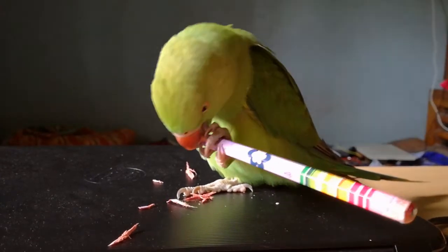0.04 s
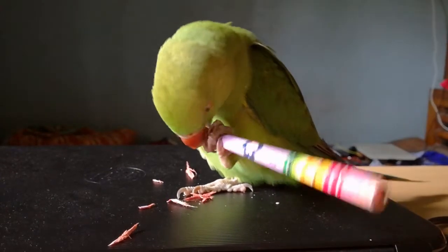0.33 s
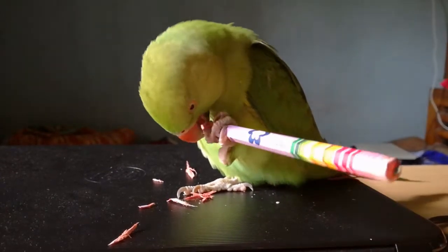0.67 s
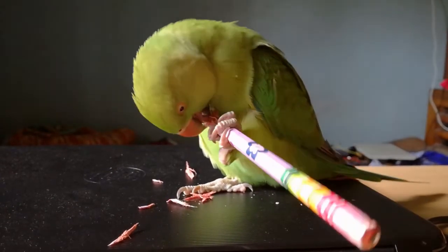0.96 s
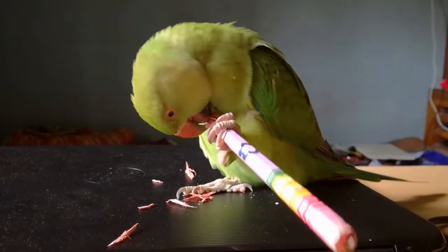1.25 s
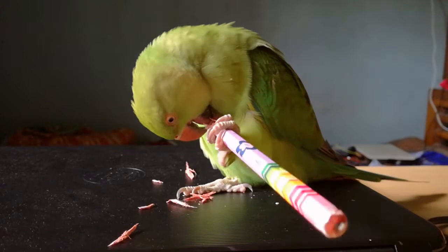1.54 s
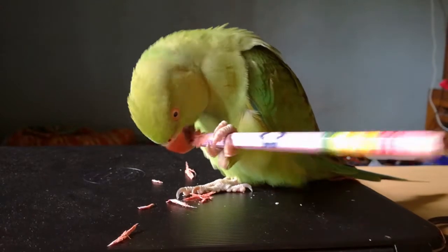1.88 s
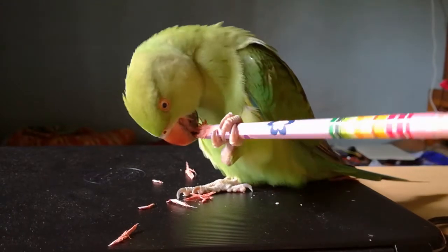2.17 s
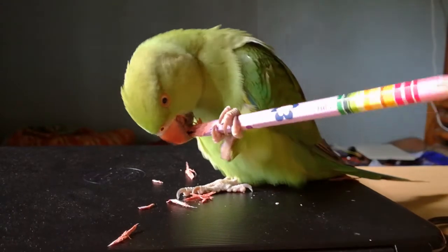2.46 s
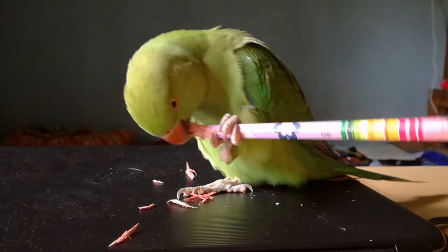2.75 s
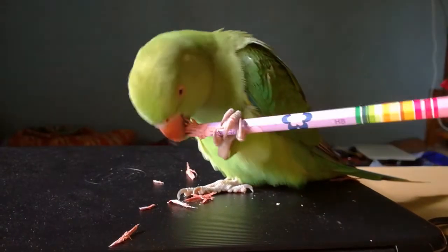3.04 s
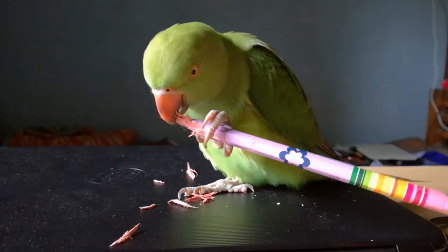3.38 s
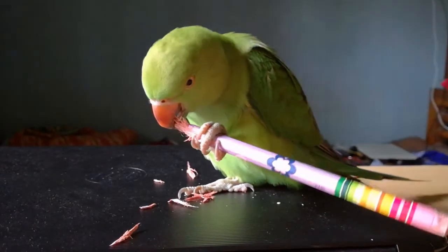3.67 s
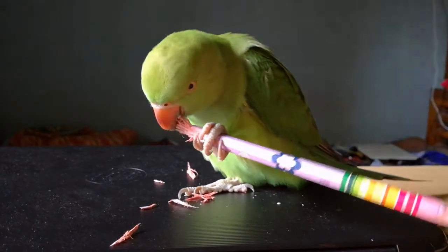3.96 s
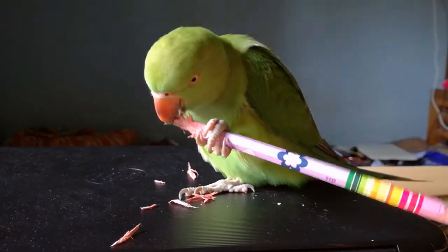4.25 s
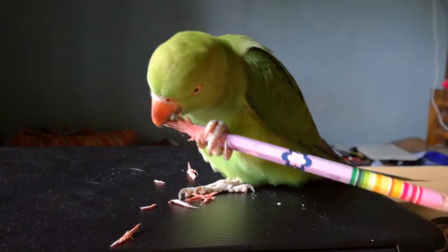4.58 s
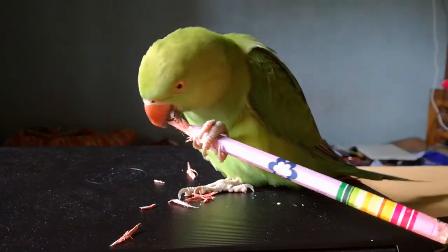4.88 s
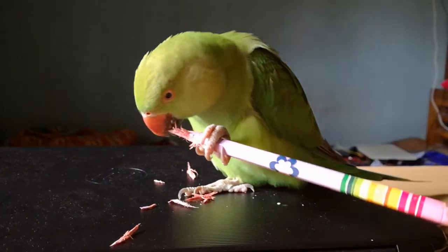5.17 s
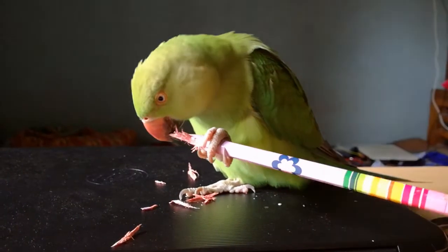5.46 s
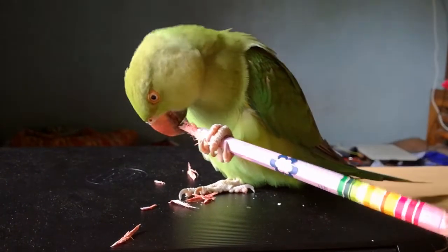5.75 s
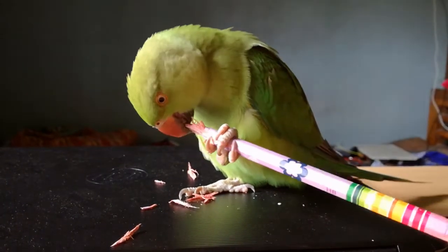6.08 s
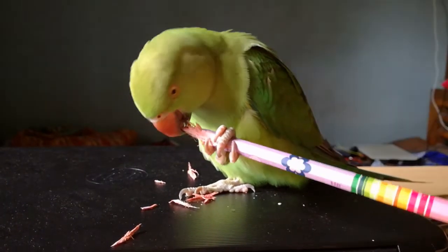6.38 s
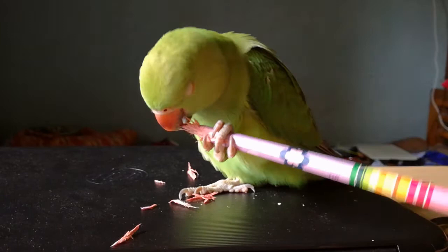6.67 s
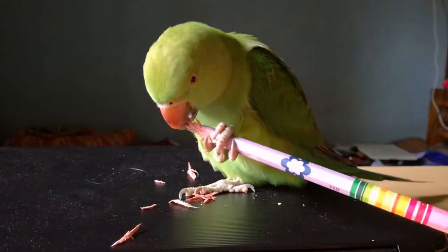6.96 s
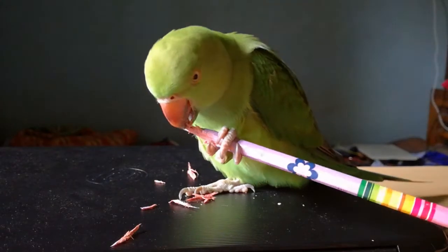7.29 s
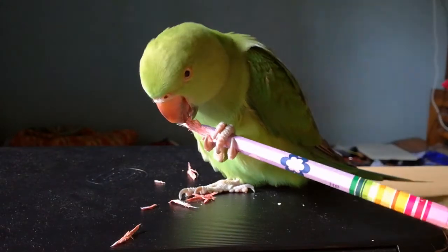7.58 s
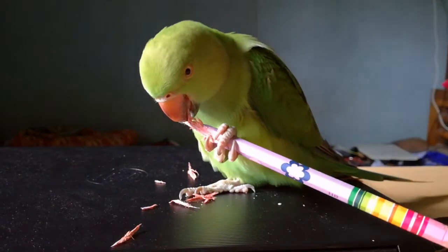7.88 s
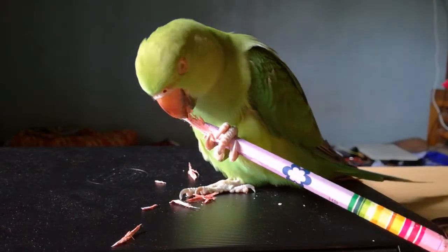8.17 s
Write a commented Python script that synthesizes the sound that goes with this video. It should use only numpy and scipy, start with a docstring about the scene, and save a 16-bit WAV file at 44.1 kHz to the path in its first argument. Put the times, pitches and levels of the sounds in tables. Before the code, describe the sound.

A fan runs in a small room with a steady rush and a low, wavering drone. Its draught buffets the microphone in uneven gusts of soft, low thumps, busier near the end. Close by, a parrot gnaws a pencil: one sharp splinter snap comes about a third of the way in, followed by a few very faint ticks and a smaller, brighter click late on.

```python
"""A small room with a fan running, a stereo microphone standing in its draught. On a table, near enough
to sound fairly dry, a parrot gnaws a pencil: now and then a splinter snaps and rings pencil and beak.
The gusts buffet one microphone port just before the other with soft, low thumps. The fan rushes,
drones and hisses, with faint whistles. A faint, steady band of noise sits near 15.5 kHz."""
import sys
import numpy as np
from scipy import signal
from scipy.fft import rfft, irfft
from scipy.io import wavfile
from scipy.ndimage import uniform_filter1d

SR = 44100
rng = np.random.default_rng(int(sys.argv[2]) if len(sys.argv) > 2 else 0)


def generate_wav(signal):
    """Clip the signal to [-1, 1] and save it as 16-bit WAV at the path in sys.argv[1]."""
    frames = np.transpose(np.atleast_2d(signal))
    scaled = np.clip(frames, -1, 1) * 32767
    pcm = np.round(scaled).astype(np.int16)
    wavfile.write(sys.argv[1], SR, pcm)


N = 367353
TIME = np.arange(N) / SR
FREQ = np.maximum(np.arange(N // 2 + 1) * SR / N, 1)


def splinters(tear_s=0.0009, fibre_db=3.5, fibres=4):
    """One crack and a few fibres after it set pencil and beak ringing; thin splinters sound brighter."""
    # splinters breaking: start_s, peak_db, tilt_db_per_octave, left_over_right_db
    snaps = [(1.8305, -66, 7, 0), (2.6780, -34, -1.3, -1), (3.363, -61, 3.5, 0), (3.8200, -64, 3, 2),
             (4.8536, -61, 10, 0), (5.2797, -57.5, 0, -4), (6.7866, -68, 8, 6), (7.5459, -48.5, 11.5, -12)]
    # resonances of pencil and beak: pitch_hz, width_hz, relative_db
    modes = [(2900, 1100, -11), (5590, 730, 1.5), (5700, 600, -32), (8000, 3000, -4.5), (11200, 1700, -8.5),
             (14000, 1600, -12)]
    out = np.zeros((2, N))
    for (start_s, peak_db, tilt_db, pan_db), chance in zip(snaps, rng.random((len(snaps), fibres))):
        tear = np.zeros(1024)
        tear[(chance * tear_s * SR).astype(int)] = from_db(fibre_db) * (-1.0) ** np.arange(fibres)
        tear[0] = 1  # the first crack
        ring = 0
        for hz, width, db in modes:
            mode = rms_one(resonate(resonate(tear, hz, width), hz, width))
            ring += from_db(db + tilt_db * np.log2(hz / modes[0][0])) * mode
        port_gains = from_db(peak_db + np.array([[pan_db], [-pan_db]]) / 2)
        add(out, port_gains * ring / np.abs(ring).max(), start_s)
    return out


def draught(port_lag_s=0.00062, right_lift_db=4.0, lift_hz=350, own_db=-17.5):
    """Air meets the right port first, and a little more sharply; each port has some swirl of its own."""
    pressure = swirls() + eddies()
    own = from_db(own_db) * swirls()
    left = np.interp(TIME - port_lag_s / 2, TIME, pressure + own)
    right = np.interp(TIME + port_lag_s / 2, TIME, pressure - own)
    edge = signal.sosfilt(signal.butter(1, lift_hz, "high", fs=SR, output="sos"), right)
    return np.array([left, right + (from_db(right_lift_db) - 1) * edge])


def swirls(small_db=-56.5, reference_gust_db=-37.5, small_growth=1.9, choppy_db=7):
    """Lumpy pressure of the draught; small swirls grow faster than large ones as it blows harder."""
    # spectrum of the large swirls: frequency_hz, relative_db
    large_spectrum = [(10, -19), (25, 0), (50, 3), (90, -0.5), (135, -8), (200, -11), (300, -27),
                      (500, -71), (1200, -120)]
    # spectrum of the small swirls: frequency_hz, relative_db
    small_spectrum = [(60, -15), (140, -13.5), (220, -1), (300, -2.5), (420, -15.5), (600, -26),
                      (850, -35.5), (2000, -110)]
    strength, lumps = flow(), drift(36)
    large = steady(noise(from_db(over_hz(large_spectrum)[0])) * from_db(2.5 * lumps), span_s=0.055)
    small = steady(noise(from_db(over_hz(small_spectrum)[0])) * from_db(4.5 * lumps), span_s=0.11)
    # from 6.1 to 7.3 s the air turns choppier, with more small swirls
    choppy = np.clip(np.minimum(TIME - 6.1, 7.3 - TIME) / 0.18, 0, 1)
    growth = (strength / from_db(reference_gust_db)) ** small_growth
    return from_db(0.5) * strength * large + from_db(small_db + choppy_db * choppy) * growth * small


def flow(rise_s=0.025, fall_s=0.034):
    """Strength of the draught: each gust rises, holds and falls back into the breeze."""
    # gusts at the microphone: start_s, length_s, level_db
    gusts = [(0.0, 0.02, -45.5), (0.345, 0.036, -41.5), (1.014, 0.044, -46), (1.149, 0.04, -37),
             (1.27, 0.081, -37.5), (1.385, 0.1, -48), (2.233, 0.033, -45.5), (2.307, 0.1, -44),
             (2.456, 0.03, -40), (2.63, 0.055, -44.5), (3.243, 0.03, -43.5), (3.433, 0.12, -42.5),
             (3.61, 0.088, -41.5), (4.063, 0.068, -46.5), (4.196, 0.06, -45.5), (4.443, 0.16, -43.5),
             (4.854, 0.11, -41.5), (5.046, 0.10, -50.5), (5.355, 0.016, -51), (5.519, 0.092, -46),
             (5.835, 0.035, -48), (5.905, 0.088, -47), (6.48, 0.076, -45), (6.598, 0.046, -41.5),
             (6.698, 0.091, -40), (6.808, 0.19, -39), (7.044, 0.064, -41.5), (7.205, 0.086, -39),
             (7.4, 0.025, -41.5), (7.468, 0.043, -39), (7.587, 0.085, -38), (7.799, 0.13, -37.5),
             (7.946, 0.095, -41.5), (8.107, 0.12, -44), (8.276, 0.027, -47.5)]
    # gentle flow between gusts: time_s, level_db
    breeze = [(0, -59.5), (0.45, -51), (0.6, -63.5), (0.85, -50), (1.5, -55.5), (1.66, -63.5),
              (1.95, -66.5), (2.15, -53), (2.55, -50.5), (2.85, -57.5), (3.8, -52), (4.0, -56.5),
              (4.75, -52.5), (5.27, -67), (5.77, -68), (6.1, -51.5), (6.4, -61.5), (8.33, -52)]
    power = from_db(2 * in_time(breeze)[0])
    for start, length, db in gusts:
        away = np.maximum(start - TIME, 0) / rise_s + np.maximum(TIME - start - length, 0) / fall_s
        power += from_db(2 * db) * np.exp(-2 * np.minimum(away, 20))
    return np.sqrt(power)


def eddies(thump_gain_db=-4, scuff_gain_db=3, scuff_s=0.016):
    """Each eddy is a broad vortex that thumps the port and breaks up with a short scuff."""
    # the strongest eddies: centre_s, thump_relative_db, pitch_hz, scuff_relative_db
    strikes = [(1.169, -20, 92.5, -74), (1.262, -23, 100, -76), (1.311, -22, 124, -70),
               (1.353, -21, 107, -61), (2.25, -25, 81.4, -76), (2.473, -30.5, 134, -67.5),
               (3.621, -22, 117, -68), (4.065, -28.5, 96.5, -60), (4.477, -37, 112, -64),
               (5.86, -29, 83, -72), (6.604, -29, 95, -68), (6.653, -24.5, 171, -51.5),
               (6.721, -21.5, 148, -66), (6.755, -24.5, 119, -64), (6.88, -19.5, 108, -46.5),
               (6.961, -17.5, 117, -60), (7.127, -20.5, 141, -61), (7.259, -21.5, 130, -57),
               (7.495, -25.5, 110, -70), (7.545, -29.5, 202, -45), (7.594, -29, 190, -47.5),
               (7.617, -23.5, 180, -44.5), (7.835, -15.5, 166, -58), (7.888, -23, 200, -52),
               (7.898, -18, 110, -47), (7.951, -25.5, 87, -68), (8.023, -23.5, 117, -65),
               (8.298, -28, 70, -74)]
    # spectrum of the scuff: frequency_hz, relative_db
    spectrum = [(100, -18), (280, 7.5), (420, -3.5), (600, -6.5), (800, -18), (1500, -64)]
    scuff = steady(noise(from_db(over_hz(spectrum)[0])), span_s=0.016)
    out = np.zeros(N)
    for (centre_s, thump_db, hz, scuff_db), skew in zip(strikes, rng.normal(0, 1, len(strikes))):
        near = np.abs(TIME - centre_s) < 4 / hz
        t = TIME[near] - centre_s
        out[near] += from_db(thump_db + thump_gain_db) * vortex(t, hz, skew)
        out[near] += from_db(scuff_db + scuff_gain_db) * np.exp(-(t / scuff_s) ** 2) * scuff[near]
    return out


def vortex(t, hz, skew):
    """Suction in the middle and a push at each flank, made lopsided by the skew."""
    u = np.pi * hz * t
    return np.exp(-u * u) * (np.cos(skew) * (2 * u * u - 1) + np.sin(skew) * 2 * u)


def fan_drone(apart_db=-13, right_db=0.5):
    """The fan's low, wavering tones swell and sink; the room makes them differ a little at each port."""
    # tones of the drone: pitch_hz, width_hz, relative_db
    tones = [(139, 9.1, -14.5), (164, 7.5, -9), (191.5, 12.4, -2.5), (215, 25, -18.5), (241.7, 9, -8),
             (291.2, 15.3, -8.5), (336, 13.5, -13), (391.5, 11, -22.5)]
    # swell of the drone: time_s, level_db
    swell = [(0.25, -56.5), (0.86, -50.5), (1.03, -60), (1.7, -53), (2.0, -57.5), (3.5, -56), (4.0, -52.5),
             (4.65, -57.5), (4.82, -51), (5.13, -55.5), (5.24, -57.5), (5.36, -53), (5.46, -62),
             (5.73, -48), (5.92, -61.5), (6.13, -48), (6.32, -59.5), (6.65, -53.5)]
    mid = steady(narrow_bands(tones), span_s=0.38)
    side = from_db(apart_db) * narrow_bands(tones)
    return np.array([mid + side, from_db(right_db) * (mid - side)]) * from_db(in_time(swell)[0])


def fan_rush(level_db=-58):
    """Broad air noise, spread by the room so that the ports agree only in the bass."""
    # spectrum of the rush: frequency_hz, relative_db
    spectrum = [(20, 8.5), (110, -5), (330, 3.5), (480, 0.5), (700, 3), (950, -1), (1600, -2.5),
                (2100, -4.5), (3000, -6.5), (4000, -13), (5400, -16.5), (7500, -25), (10500, -32.5),
                (15500, -35)]
    # stereo image at the microphone: frequency_hz, correlation, left_over_right_db
    image = [(60, 0.58, 11), (200, 1, 0), (360, 0.72, 5), (503, 0.076, -1), (714, -0.072, -1),
             (955, 0.043, 1.5), (1260, -0.22, 0), (1500, 0.12, -4.5), (2000, 0.16, -0.9),
             (2440, -0.23, 6.5), (3430, 0.15, -2), (4150, 0.00018, 0), (8000, -0.15, -0.5),
             (11600, 0.14, 0.8)]
    alike, pan_db = over_hz(image)
    sides = np.array([[1], [-1]])
    mid, side = rfft(rng.standard_normal((2, N)))
    ports = (np.sqrt(1 + alike) * mid + sides * np.sqrt(1 - alike) * side) * from_db(sides * pan_db / 2)
    return rms_one(irfft(ports * from_db(over_hz(spectrum)[0]), N)) * from_db(level_db)


def fan_whistles(waver_db=3.5):
    """Faint, breathy whistles reach both ports alike, each wavering on its own."""
    # whistles: pitch_hz, width_hz, level_db before the waver
    bands = [(1488, 40, -78.5), (1620, 65, -77.5), (3340, 250, -83)]
    return sum(narrow_bands([band]) * from_db(waver_db * drift(5.1)) for band in bands)


def fan_hiss(waver_db=3.0):
    """At one port, faint narrow bands waver in the air noise and a thin sizzle comes and goes."""
    # bands of the hiss: pitch_hz, width_hz, level_db before the waver
    bands = [(683, 22, -78.5), (1180, 150, -71.5), (5500, 840, -100)]
    # band of the sizzle: pitch_hz, width_hz, relative_db
    sizzle_band = [(8970, 360, -1.5)]
    # swell of the sizzle: time_s, gain_db
    sizzle_swell = [(0, -88), (.6, -86), (1.1, -91), (1.8, -84.5), (3.1, -82.5), (3.3, -91), (4.0, -90),
                    (4.4, -87.5), (7.1, -83.5), (7.5, -88)]
    hiss = narrow_bands(bands) * from_db(waver_db * drift(4.8))
    return hiss + narrow_bands(sizzle_band) * from_db(in_time(sizzle_swell)[0])


def high_band():
    """A faint, steady band of noise near 15.5 kHz."""
    # band of noise: centre_hz, width_hz, level_db
    band = [(15520, 130, -91.5)]
    return narrow_bands(band)


def room(x, t60_s=0.27, level_db=-6.5, wall_cut_hz=4800, first_echo_s=0.00089):
    """The walls return a diffuse, slightly dull tail, different at each port."""
    t = TIME[:SR // 2]
    tail = rng.standard_normal((2, len(t))) * from_db(-60 * t / t60_s) * (t > first_echo_s)
    tail = signal.sosfilt(signal.butter(1, wall_cut_hz, fs=SR, output="sos"), tail)
    tail /= np.sqrt(np.sum(tail ** 2, axis=1, keepdims=True))
    return from_db(level_db) * signal.fftconvolve(x, tail, axes=1)[:, :N]


def narrow_bands(bands):
    """Noise through sharp resonances: wavering and half-pitched."""
    power = sum(from_db(2 * db) / width / (1 + ((FREQ - hz) / width) ** 2) ** 2 for hz, width, db in bands)
    total_rms = np.sqrt(sum(from_db(2 * db) for _, _, db in bands))
    return total_rms * noise(np.sqrt(power))


def noise(gain):
    """Steady noise with the given gain at each frequency; rms 1."""
    return rms_one(irfft(rfft(rng.standard_normal(N)) * gain, N))


def drift(rate_hz):
    """Slow random wander with spread 1."""
    return noise(1 / (1 + (FREQ / rate_hz) ** 2))


def steady(x, span_s):
    """Even out the slow swings of a noise and keep its quick lumps."""
    return x / np.sqrt(uniform_filter1d(x * x, int(span_s * SR)) + 1e-9)


def resonate(x, hz, width_hz):
    """Two-pole resonance with gain 1 at its peak."""
    r = np.exp(-np.pi * width_hz / SR)
    feedback = [1, -2 * r * np.cos(2 * np.pi * hz / SR), r * r]
    return signal.lfilter(np.array([1, 0, -1]) * (1 - r * r) / 2, feedback, x + 1e-18)


def over_hz(rows):
    """Each column of a table, joined on a log-frequency axis."""
    hz, *columns = np.transpose(rows)
    return [np.interp(np.log(FREQ), np.log(hz), c) for c in columns]


def in_time(rows):
    """Each column of a table, joined by straight lines in time."""
    time_s, *columns = np.transpose(rows)
    return [np.interp(TIME, time_s, c) for c in columns]


def add(track, sound, start_s):
    """Mix a stereo sound in at a given time."""
    start = round(start_s * SR)
    track[:, start:start + sound.shape[1]] += sound[:, :N - start]


def from_db(db):
    """Decibels to gain."""
    return 10 ** (np.asarray(db) / 20)


def rms_one(x):
    """Scale to unit power."""
    return x / np.sqrt(np.mean(x ** 2) + 1e-20)


def scene():
    """Splinters in the room, over the fan and its draught on the microphone."""
    snaps = splinters()
    fan = fan_rush() + fan_drone() + fan_whistles() + np.array([fan_hiss(), fan_hiss()])
    return snaps + room(snaps) + fan + draught() + high_band()


def record(dry):
    """The recorder cuts the top steeply above 15750 Hz."""
    return signal.sosfilt(signal.ellip(12, 0.1, 80, 15750, fs=SR, output="sos"), dry)


dry = scene()
out = record(dry)
generate_wav(out)
```